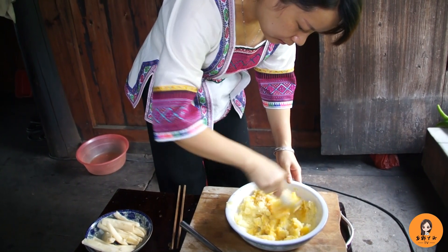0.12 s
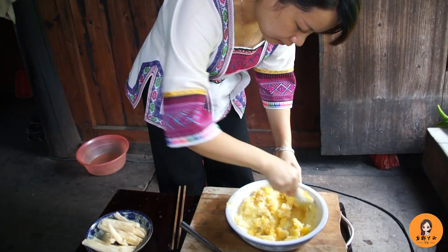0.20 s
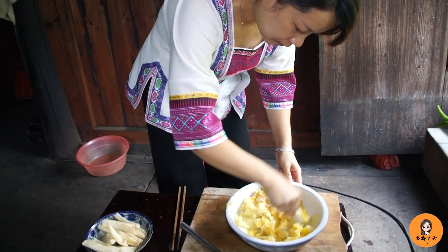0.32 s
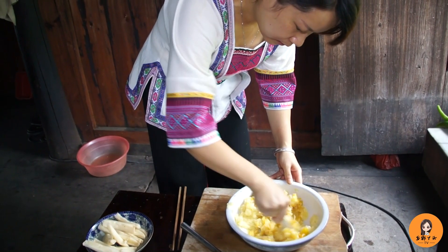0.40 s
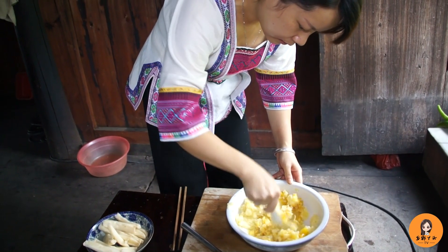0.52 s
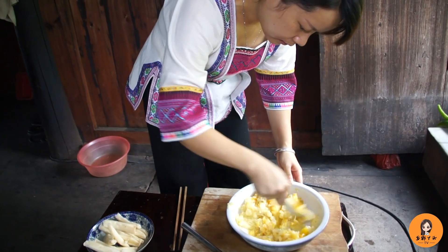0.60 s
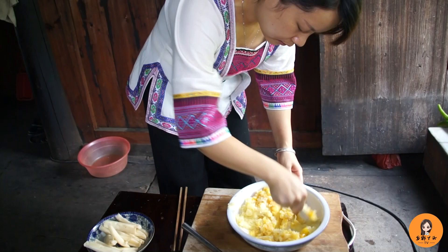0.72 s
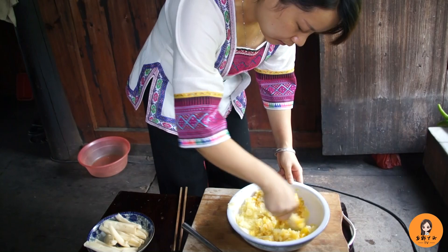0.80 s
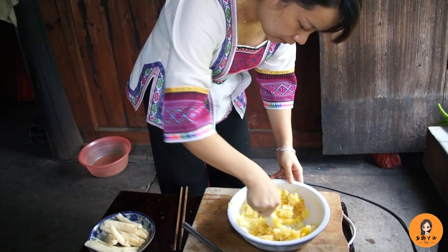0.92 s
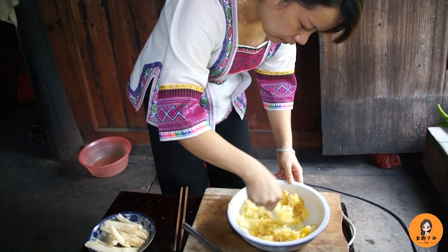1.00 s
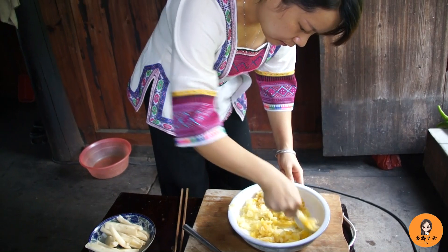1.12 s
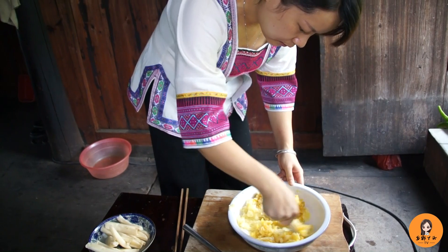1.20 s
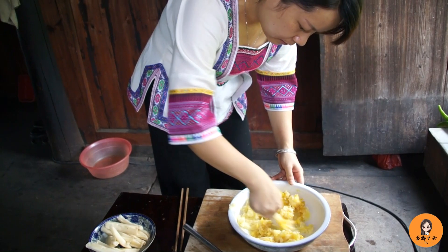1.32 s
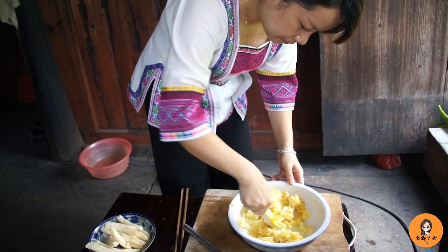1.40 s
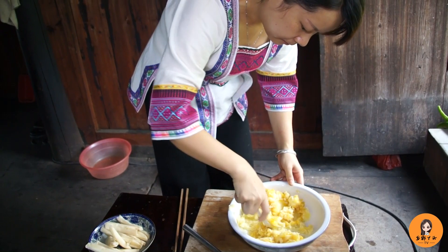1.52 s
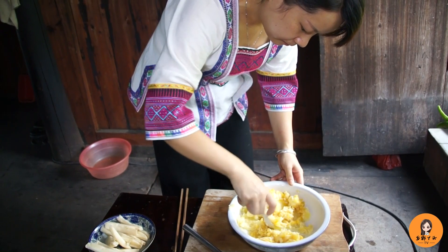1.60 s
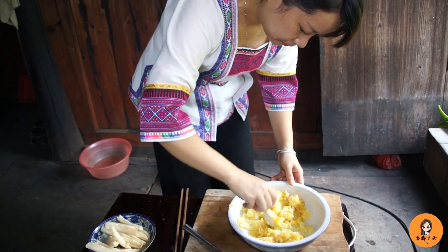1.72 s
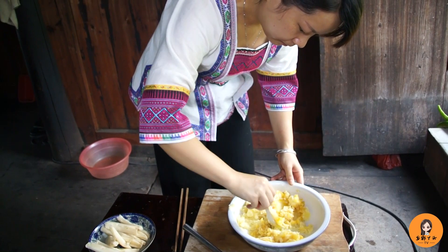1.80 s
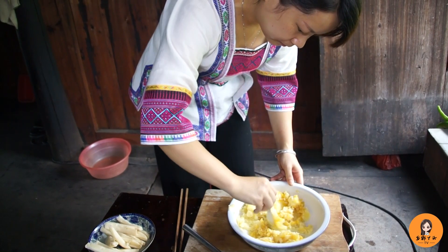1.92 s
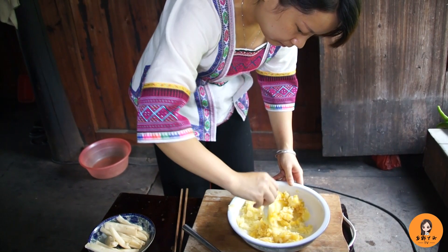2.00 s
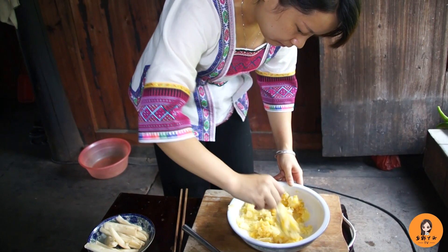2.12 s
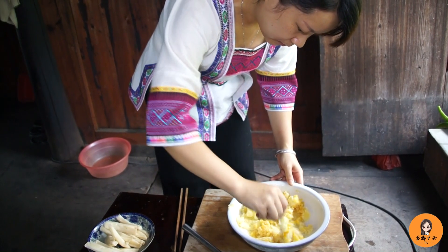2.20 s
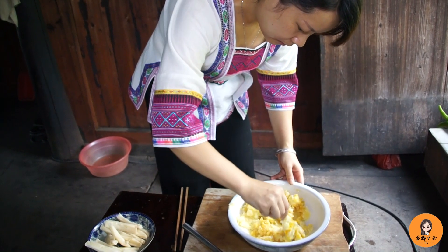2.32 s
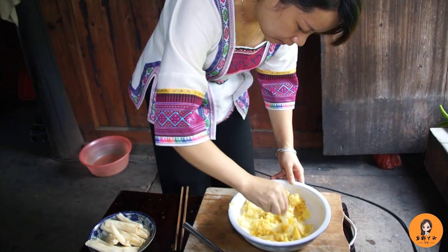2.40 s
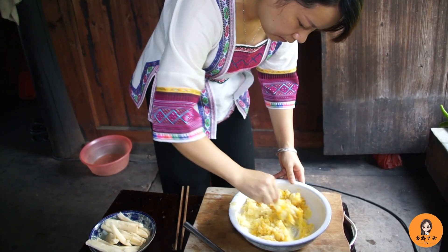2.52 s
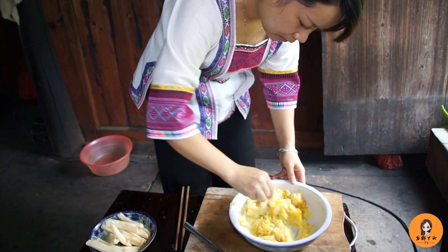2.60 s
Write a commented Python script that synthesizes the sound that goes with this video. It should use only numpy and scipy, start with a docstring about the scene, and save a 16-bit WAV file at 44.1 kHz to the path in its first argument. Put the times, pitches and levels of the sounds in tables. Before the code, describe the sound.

Spoon mixing food in an enamel bowl: two bright, quickly damped clanks, a dull thud, a quiet tick, then a heavier knock and soft bump, with short room echo, light scrapes and low steady background noise.

```python
"""Over a steady outdoor hush a faint thin whistle wavers and dies, and soft scrapes of a spoon through
food recur. The metal spoon knocks an enamel bowl twice, bumps dully, taps drily, then knocks and bumps
again in a bare wooden kitchen. Knocks are quickly damped modes plus a broad thud, bumps and scrapes are
shaped noise, the room is random echoes; a stereo microphone colours everything with dips."""
import sys
import numpy as np
from scipy import signal
from scipy.io import wavfile
from scipy.ndimage import uniform_filter1d

SR = 44100
rng = np.random.default_rng(int(sys.argv[2]) if len(sys.argv) > 2 else 0)


def int16_out(signal):
    """Quantize to a 16-bit WAV file."""
    q = np.round(np.clip(np.atleast_2d(signal).T, -1, 1) * 32767)
    wavfile.write(sys.argv[1], SR, q.astype(np.int16))


def undo_db(level):
    """Turn decibels back into plain size, where 20 dB means ten times bigger."""
    steps = np.asarray(level, float) / 20
    return 10 ** steps


N = 114660

# spoon on bowl wall: t/s, ring level/dB, thud level/dB, ring tilt/(dB/octave), thud tilt/(dB/octave),
# lowest-mode gain/dB, short-mode gain/dB, ring t60 factor
KNOCKS = [(0.2071, -5, 1.5, 0.5, -1.17, -1, 1.46, 0.56), (0.685, -7.5, 1, -5, -1.05, -14, -3.1, 0.8),
          (2.189, -9, 8.14, 0.6, 0.015, 2.5, -10, 1.25)]


def evened(x):
    """Scales to rms 1."""
    return x / np.sqrt(np.mean(x ** 2) + 1e-20)


def read(points, hz):
    """Interpolates a table on a log-frequency axis."""
    f, value = np.transpose(points)
    return np.interp(np.log(hz + 1), np.log(f + 1), value)


def add(mix, start_s, sound):
    """Mixes a sound in at start_s, cut at the end of the mix."""
    part = mix[..., round(start_s * SR):][..., :sound.shape[-1]]
    part += sound[..., :part.shape[-1]]


def paired(z, same):
    """Makes the right spectrum partly like the left by the given likeness."""
    same = np.clip(same, -1, 1)[:, None]
    right = same * z[0] + np.sqrt(1 - same ** 2) * z[1]
    return np.array([z[0], right])


def hush():
    """Steady coloured noise with faint patches, swollen at first by the dying tail of an earlier knock."""
    # hush colour: f/Hz, level/dB
    hush_colour = [(21, -15), (60, -14), (130, -20.5), (200, -6.5), (450, -1.2), (1000, -1.8), (2000, -9),
                   (4500, -11), (6300, -15), (6900, -13), (7350, -8.5), (7700, -15.5), (10000, -19),
                   (13000, -25), (14000, -40), (16000, -50)]
    # left-right likeness: f/Hz, likeness
    hush_likeness = [(60, 0.11), (240, -0.029), (950, 0.13), (3770, 0.8), (15000, -0.24)]
    # channel balance: f/Hz, left minus right/dB
    hush_balance = [(60, 0), (180, 5.5), (550, 2.5), (1650, 2), (4970, -2), (15000, 2.5)]
    hush_db, patch_db = -57.5, 1.4
    tail_db, tail_t60_s = -51.5, 1

    frames, hz = N // 256 + 5, np.fft.rfftfreq(1024, 1 / SR)
    a, b, c, d, patches = rng.standard_normal((frames, 513, 5)).T
    patches = uniform_filter1d(patches, size=12, axis=0)  # over frequency
    patches = evened(uniform_filter1d(patches, size=14, axis=1))  # over time
    z = paired([a + 1j * b, c + 1j * d], read(hush_likeness, hz))
    sides_db = read(hush_balance, hz)[:, None] / 2 * np.array([1, -1])[:, None, None]
    z = z * undo_db(read(hush_colour, hz)[:, None] + sides_db + patch_db * patches)
    noise = evened(signal.istft(z, nperseg=1024, noverlap=768)[1][:, :N])
    t = np.arange(N) / SR
    tail_power = undo_db(2 * (tail_db - 60 * t / tail_t60_s))
    return np.sqrt(undo_db(2 * hush_db) + tail_power) * noise


def whistle():
    """A thin sine, wavering slightly in pitch, that fades, swells once more and dies; louder right."""
    # whistle track: t/s, f/Hz, rms level before side gain/dB
    whistle_track = [(0, 1787, -58), (.035, 1805, -64), (.065, 1800, -69.5), (.095, 1797, -62),
                     (.14, 1776, -62.5), (.2, 1780, -70), (.26, 1784, -77)]
    side_db = 5.5  # down on the left, up on the right

    s, hz, db = np.transpose(whistle_track)
    t = np.arange(N) / SR
    phase = 2 * np.pi * np.cumsum(np.interp(t, s, hz)) / SR + 2 * np.pi * rng.random()
    envelope = np.sqrt(2) * undo_db(np.interp(t, s, db)) * (t < s[-1])
    return undo_db([[-side_db], [side_db]]) * envelope * np.sin(phase)


def room(x):
    """Sparse random echoes, each band dying at its own speed; new echoes at every call."""
    # reverberation: f/Hz, t60/s
    room_t60 = [(100, 0.27), (200, 0.37), (500, 0.55), (1200, 0.5), (3000, 0.43), (6000, 0.39),
                (10000, 0.39), (13000, 0.22)]
    # left-right likeness: f/Hz, likeness
    room_likeness = [(100, 1), (300, 0.94), (600, 0.89), (1400, 0.37), (3000, -0.022)]
    room_db, gap_s, rise_s = 4, 0.001, 0.0013

    taps, t = np.zeros((2, 32000)), np.arange(32000) / SR
    at = np.arange(0, 32000, 20) + rng.integers(0, 20, (2, 1600))  # one echo per 20 samples
    np.put_along_axis(taps, at, rng.choice([-1., 1.], at.shape), 1)
    hz, frames_s, z = signal.stft(taps, SR, nperseg=256)
    decay = undo_db(-60 * frames_s / read(room_t60, hz)[:, None])
    z = paired(z, read(room_likeness, hz)) * decay
    tail = signal.istft(z, SR, nperseg=256)[1][:, :32000]
    tail = tail * np.clip((t - gap_s) / rise_s, 0, 1)
    tail = tail / np.linalg.norm(tail[0])
    return undo_db(room_db) * signal.fftconvolve(x[None], tail, axes=1)


def placed(start_s, x, wet_db=0):
    """Direct sound, slightly later on the left, plus room shifted by wet_db; returned with its start."""
    left_lag_s = .00005
    out, sample = undo_db(wet_db) * room(x), np.arange(len(x))
    left = np.interp(sample - left_lag_s * SR, sample, x)
    out[:, :len(x)] += [left, x]
    return start_s, out


def scrape(start_s, length_s, db, hz, width_hz):
    """Spoon sliding through food: uneven grains through a broad band under a swelling stroke."""
    grains_per_s, grain_spread_db = 4000, 3.2
    n = round(length_s * SR)
    grains = undo_db(grain_spread_db * rng.exponential(1, n))
    grains = grains * (rng.random(n) < grains_per_s / SR) * rng.choice([-1, 1], n)
    edges_hz = [hz - width_hz / 2, hz + width_hz / 2]
    band = signal.butter(2, edges_hz, "bandpass", fs=SR, output="sos")
    stroke = undo_db(db) * np.hanning(n) * evened(signal.sosfilt(band, grains))
    return placed(start_s, stroke, wet_db=-7)


def causal(db_of_hz):
    """Minimum-phase impulse response with the given gain curve."""
    log_gain = np.log(undo_db(db_of_hz(abs(np.fft.fftfreq(8192, 1 / SR)))))
    return np.fft.ifft(np.exp(np.conj(signal.hilbert(log_gain)))).real[:3000]


def tilted(table, tilt_db):
    """A single click with the table's colour, tilted in dB per octave about 3 kHz, energy 1."""
    click = causal(lambda f: read(table, f) + tilt_db * np.log2(np.clip(f, 200, 10000) / 3000))
    return click / np.linalg.norm(click)


def knock(start_s, ring_db, thud_db, ring_tilt_db, thud_tilt_db, lowest_db, short_db, t60_factor):
    """A short contact rings the bowl's damped modes and sends out a broad thud of spoon and board."""
    # bowl modes: f/Hz, level before knock gains/dB, t60 before knock factor/s
    bowl_modes = [(1564, -9, 0.067), (2900, -2.1, 0.059), (2940, 0.76, 0.033), (4589, 3.16, 0.028),
                  (6520, -14, 0.083), (8705, -18, 0.044), (9810, -27, 0.027), (10900, -31, 0.044),
                  (12310, -47, .05)]
    # quickly damped modes beside them: same columns, f/Hz, level/dB, t60/s
    short_modes = [(1074, -13.5, 0.022), (1595, -3.5, 0.026), (2046, -8.5, 0.017), (3155, -10.5, 0.022),
                   (4034, -5.5, 0.028), (4472, -2.5, 0.027)]
    # thud colour before tilt: f/Hz, level/dB
    thud_colour = [(60, -48), (140, -17), (200, -14), (430, -7), (1000, 4.46), (2000, -2.5), (3300, -2),
                   (4300, 2.5), (5500, 0.5), (7500, -5.5), (8800, -16.5), (9300, -29), (10300, -22.5),
                   (11500, -41.5), (16000, -47.5)]
    scatter_db, rise_s = 1.8, 0.00021

    t = np.arange(0, .4, 1 / SR)
    hz, db, t60_s = np.array(bowl_modes + short_modes).T[..., None]
    db = db + ring_tilt_db * np.log2(hz / 3000) + scatter_db * rng.standard_normal(hz.shape)
    db[0] += lowest_db
    db[len(bowl_modes):] += short_db
    sign = (-1.) ** hz.argsort(0).argsort(0)  # alternates up the frequency scale
    modes = sign * undo_db(db - 60 * t / (t60_s * t60_factor)) * np.sin(2 * np.pi * hz * t)
    sound = modes.sum(0) * undo_db(ring_db) * (1 - np.exp(-t / rise_s))
    add(sound, 0, undo_db(thud_db) * tilted(thud_colour, thud_tilt_db))
    return placed(start_s, sound)


def thump():
    """The board under the bowl gives a short low damped note at each knock."""
    # board note: f/Hz, t60/s, [level/dB at each knock]
    board_note = (441, 0.048, [-35.5, -35, -21])
    hz, t60_s, levels_db = board_note
    out, t = np.zeros((2, N)), np.arange(0, .2, 1 / SR)
    for row, db in zip(KNOCKS, levels_db):
        note = undo_db(db - 60 * t / t60_s) * np.sin(2 * np.pi * hz * t) * (1 - np.exp(-t * hz))
        add(out, *placed(row[0], note))
    return out


def bump(start_s, db, tilt_db, decay_s):
    """Spoon landing through food without ring: a ragged decaying contact with a dull broad colour."""
    # bump colour before tilt: f/Hz, level/dB
    bump_colour = [(60, -45), (140, -32), (200, -12.5), (430, -7), (900, 1.3), (1800, -8.5), (3000, -7),
                   (5000, -9.5), (8000, -16.5), (10200, -23), (10800, -38), (16000, -68)]
    t = np.arange(0, .03, 1 / SR)
    ragged = rng.standard_normal(len(t)) * np.exp(-t / decay_s)
    ragged = ragged / np.linalg.norm(ragged)
    return placed(start_s, undo_db(db) * np.convolve(ragged, tilted(bump_colour, tilt_db)))


def tap():
    """A small dry tick with a low after-knock: damped sines without room, louder right."""
    # tap partials: t/s, level before side gain/dB, f/Hz, t60/s
    tap_partials = [(1.452, -38.5, 2900, 0.006), (1.4517, -34.5, 1950, 0.0031), (1.452, -37, 850, 0.013),
                    (1.455, -45.5, 448, 0.036), (1.455, -42.5, 293, 0.039)]
    out, t = np.zeros((2, N)), np.arange(0, .1, 1 / SR)
    sides = undo_db([[-2.5], [2.5]])
    for start_s, db, hz, t60_s in tap_partials:
        partial = undo_db(db - 60 * t / t60_s) * np.sin(2 * np.pi * hz * t) * (1 - np.exp(-t * hz * 2))
        add(out, start_s, sides * partial)
    return out


def scene():
    """Sums all sources in the kitchen."""
    # spoon through food: t/s, length/s, level before swell/dB, centre f/Hz, width/Hz
    scrape_rows = [(0.003, .05, -51, 4800, 2500), (.484, .04, -48, 5500, 3600),
                   (1.17, .06, -65, 4600, 2000), (1.905, .09, -61, 4600, 900),
                   (2.475, .04, -50, 5000, 3500), (2.51, .035, -50, 4800, 3000)]
    # ringless landings: t/s, level/dB, tilt/(dB/octave), contact decay/s
    bump_rows = [(0.8566, -3, -0.1, .003), (2.452, -13.5, -1, 0.0075)]
    mix = hush() + whistle() + thump() + tap()
    for play, rows in [(scrape, scrape_rows), (knock, KNOCKS), (bump, bump_rows)]:
        for row in rows:
            add(mix, *play(*row))
    return mix


def roll_off(x):
    """The treble ends steeply here."""
    return signal.sosfilt(signal.butter(12, 16030, fs=SR, output="sos"), x)


def record(dry):
    """Microphone colour with narrow dips, then a hard ceiling at full scale."""
    # microphone response: f/Hz, level/dB
    mic_response = [(100, -3), (480, 1.44), (620, -2.5), (760, 1.5), (1150, 1.5), (1380, -8.5),
                    (1550, -3.5), (1900, 2.06), (2200, -2.5), (2380, -18), (2520, -3), (2800, 3.5),
                    (3100, 0.5), (3480, -6.5), (3850, 2.5), (4100, 1), (16000, -5.55)]
    colour = causal(lambda f: read(mic_response, f))
    heard = signal.fftconvolve(dry, colour[None], axes=1)[:, :N]
    return roll_off(np.clip(heard, -1, 1))


dry = scene()
out = record(dry)
int16_out(out)
```